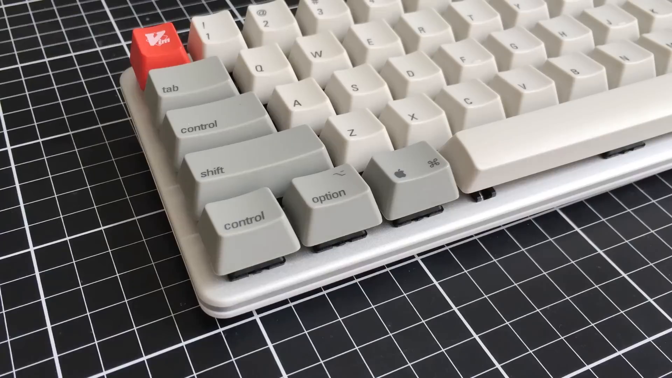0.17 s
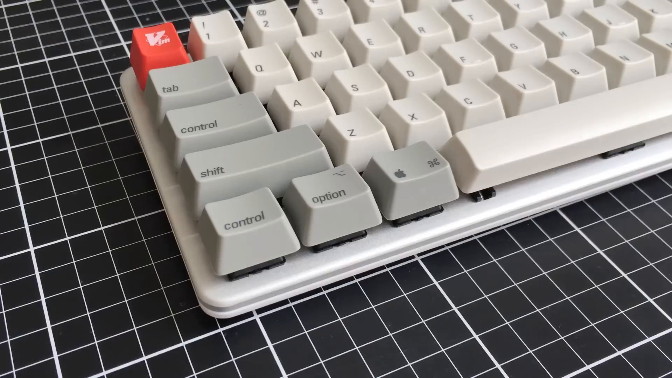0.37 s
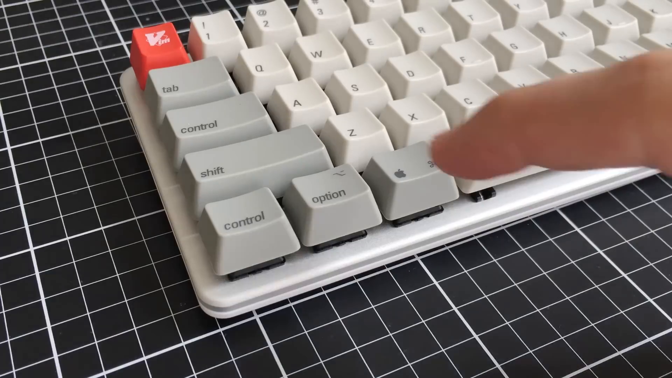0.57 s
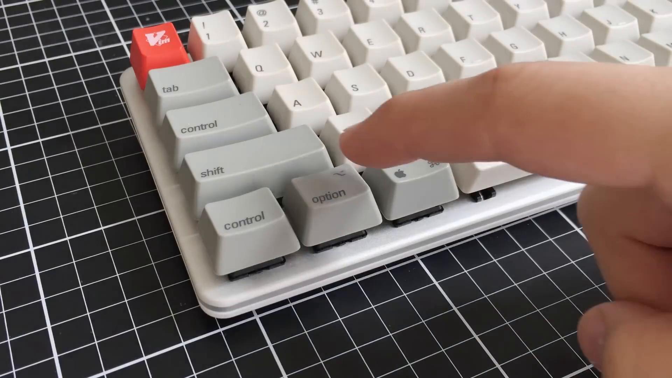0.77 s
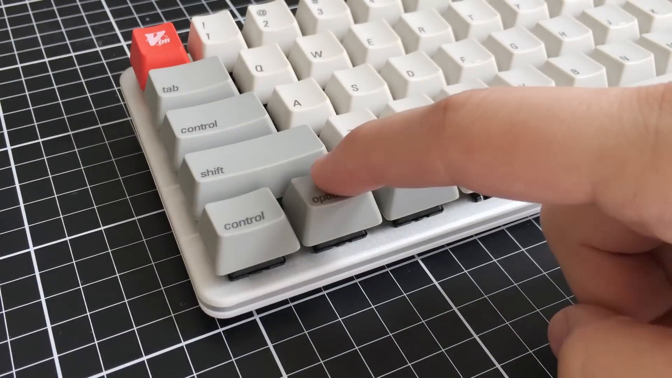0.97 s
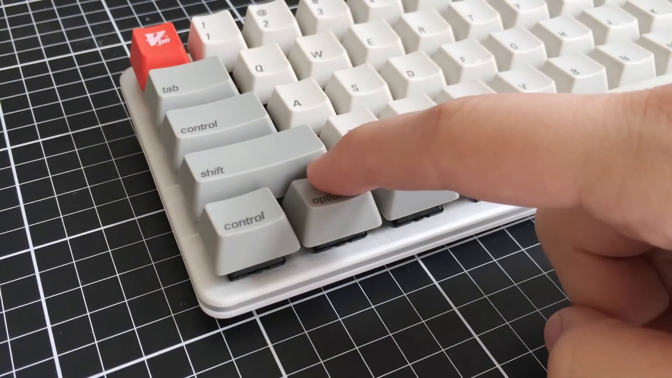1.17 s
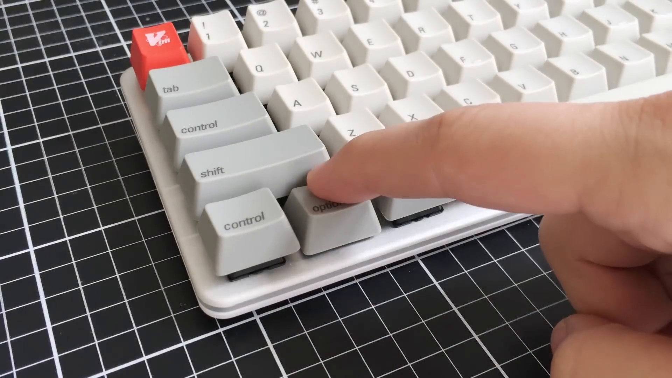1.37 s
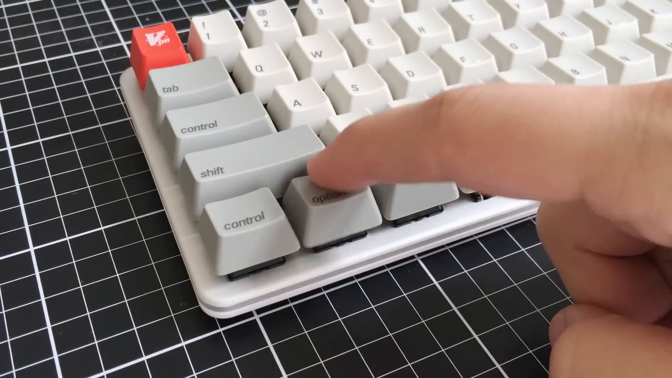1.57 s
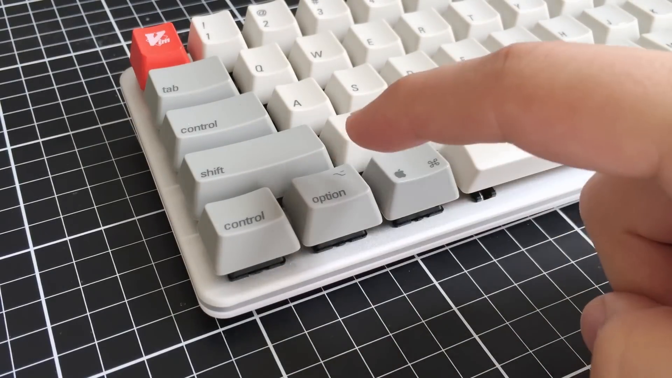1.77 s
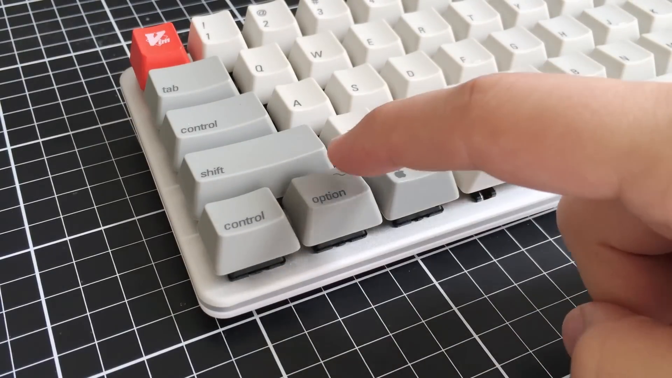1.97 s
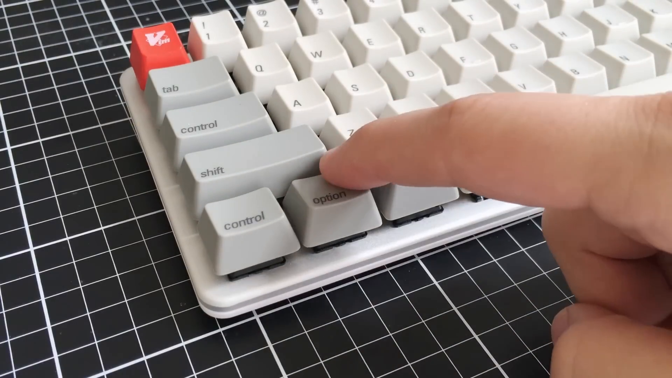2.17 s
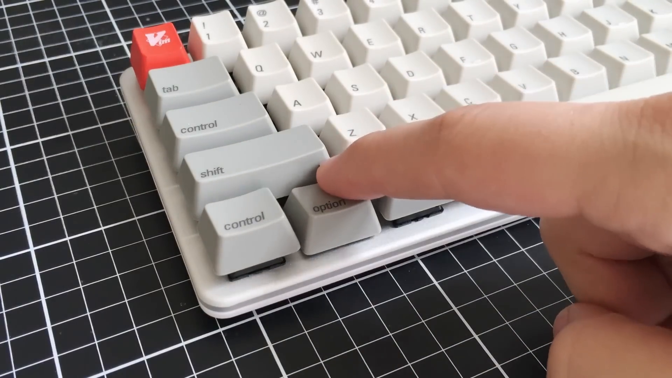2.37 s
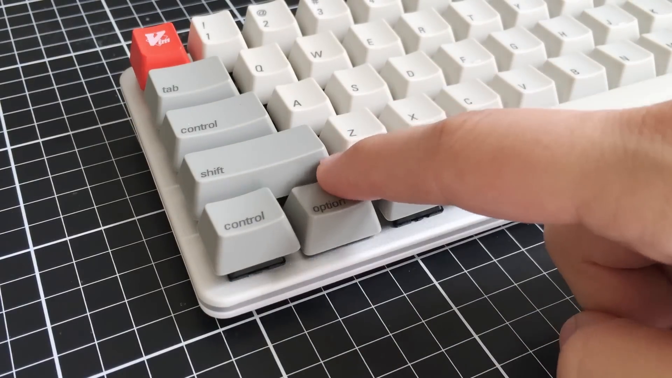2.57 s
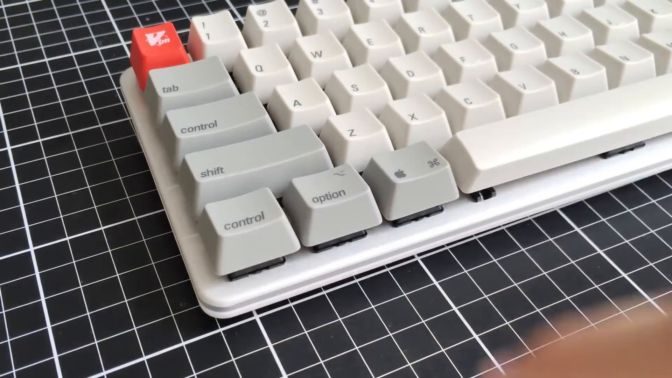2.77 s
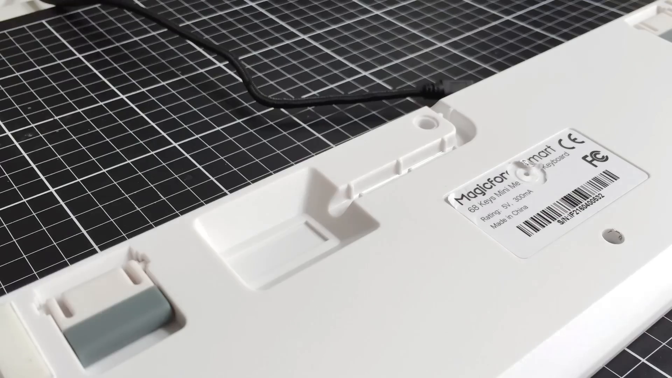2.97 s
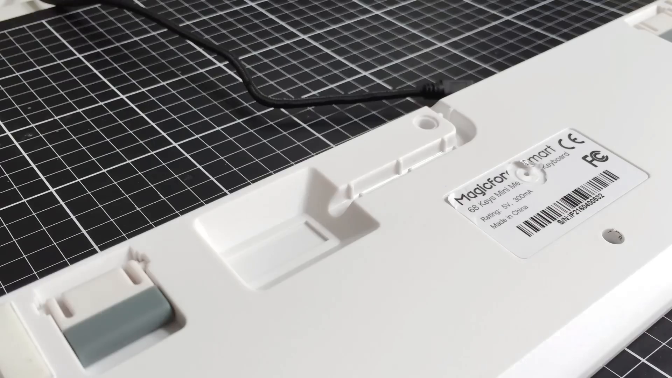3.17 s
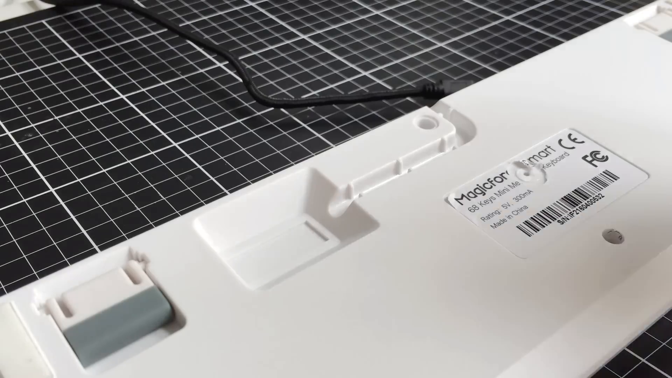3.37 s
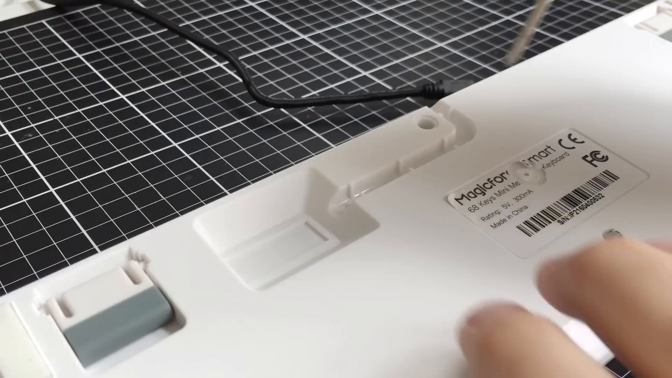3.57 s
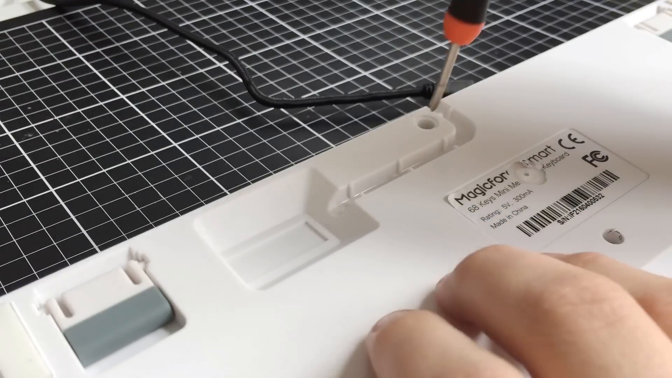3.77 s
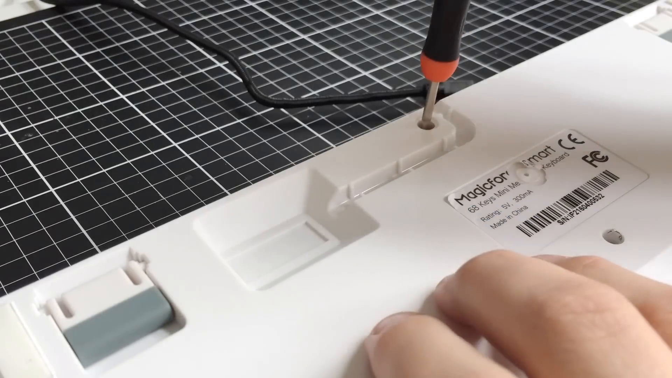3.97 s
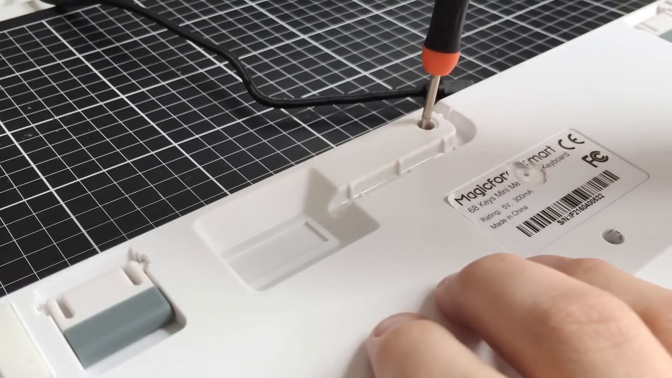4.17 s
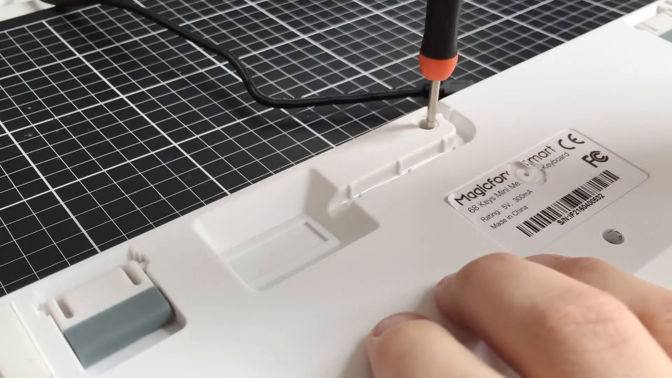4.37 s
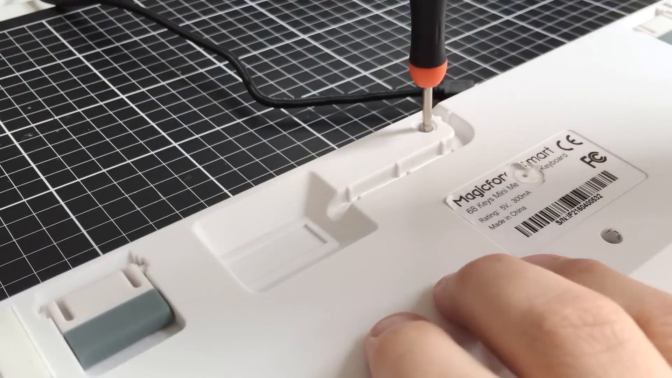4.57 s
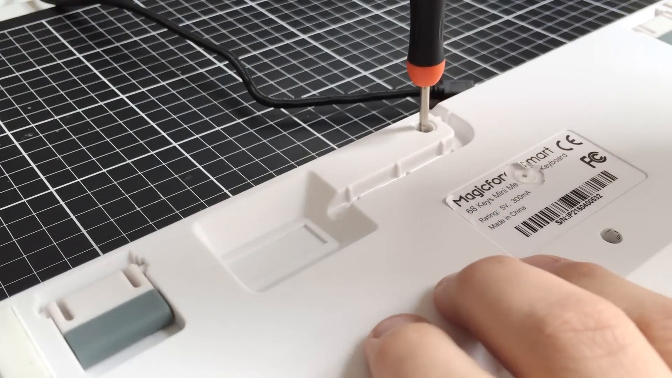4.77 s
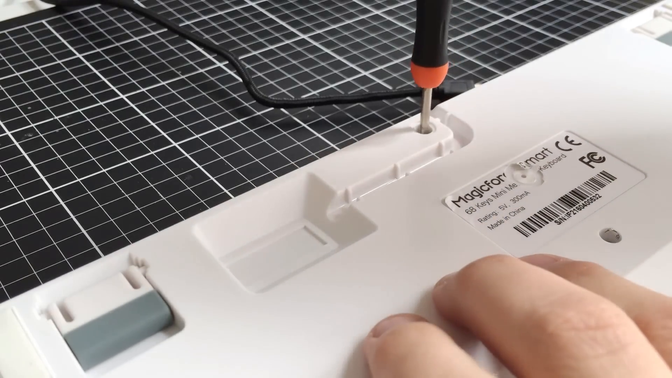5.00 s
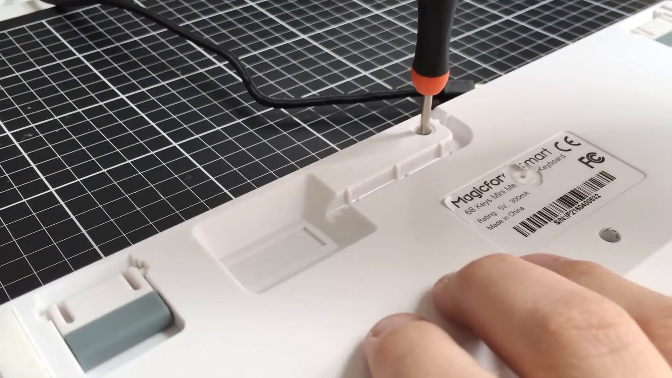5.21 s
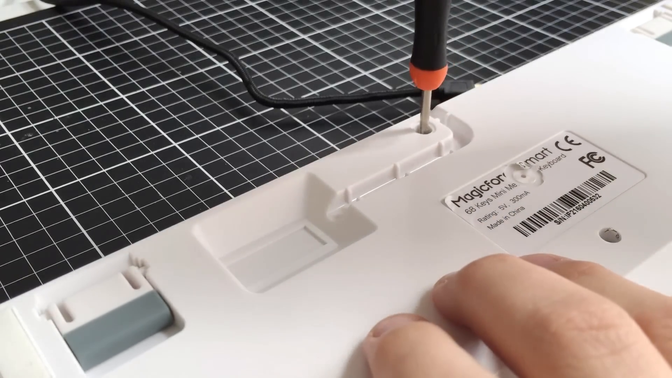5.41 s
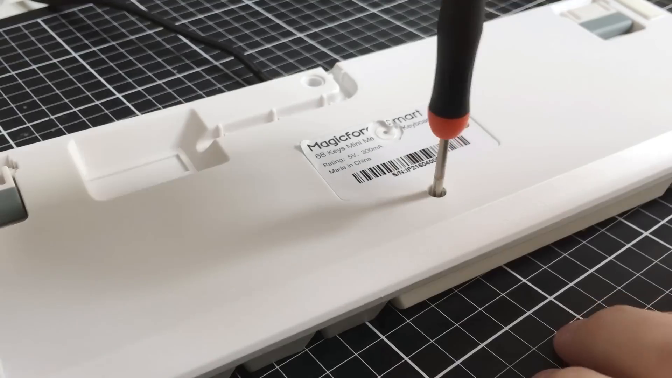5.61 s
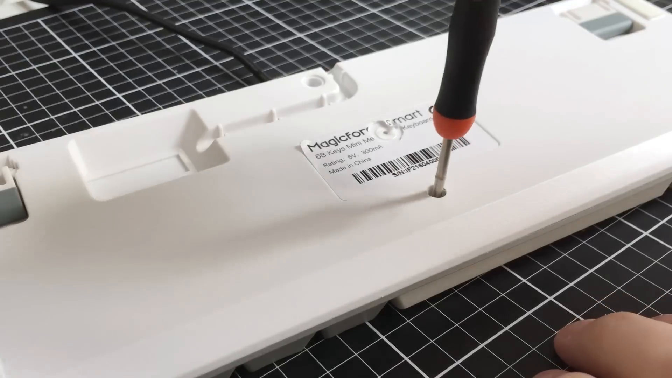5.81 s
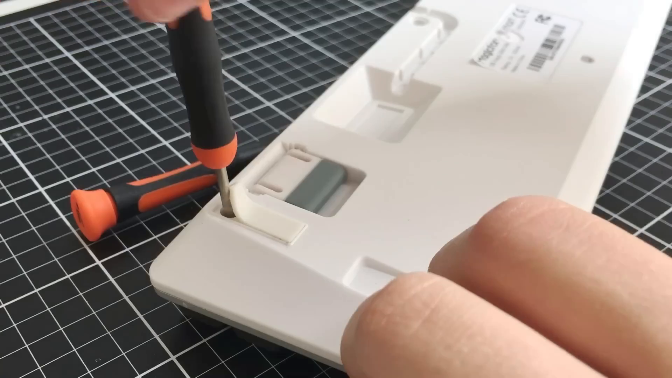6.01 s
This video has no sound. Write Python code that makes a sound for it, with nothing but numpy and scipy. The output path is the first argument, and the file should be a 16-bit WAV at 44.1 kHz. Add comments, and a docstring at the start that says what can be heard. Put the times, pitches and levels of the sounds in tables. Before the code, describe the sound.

The first 0.1 seconds are silent, then a quiet low room hum with slightly wavering tones begins. At 1.2 a fingertip faintly touches a plastic key; at 1.46 it bottoms out with a loud, crisp clack and a small desk thump, and at 1.7 snaps back up, softer and doubled. The pattern repeats: very light touch at 2.27, hard clack at 2.5, release at 2.73. At 2.95 sound drops out for an instant at a cut, and the hum returns. A barely audible touch comes at 3.23. From 4.03 a screwdriver knocks a hollow plastic case, with sharp clustered knocks around 4.47-4.5, 4.79, 4.86 and 4.98, over short gritty turns, low bumps and faint skin rustle. After 5 seconds the ticks are mostly faint, with a stronger one at 5.66 and tiny squeaks near 5.6, 5.7 and 5.94. Close microphone, small room, soft short tail.

```python
"""A desk in a small humming room: a finger touches, presses and releases a plastic key twice by a phone.
After a splice comes one more light touch, then a screwdriver knocks and turns in the upturned case.
Blows ring lists of dying tones and push the desk; turning is gritty clicks, hiss, rumble and squeaks.
Random taps make one early echo and a soft tail; shaped noise makes the hum."""
import sys
import numpy as np
from scipy import signal
from scipy.io import wavfile
from scipy.ndimage import uniform_filter1d

SR = 44100
rng = np.random.default_rng(int(sys.argv[2]) if len(sys.argv) > 2 else 0)


def undo_db(level):
    """Turn decibels back into plain size, where 20 dB means ten times bigger."""
    steps = np.asarray(level, float) / 20
    return 10 ** steps


def store_wav(level_fs):
    """Save 16-bit WAV to argv[1]."""
    pcm = np.round(np.clip(np.atleast_2d(level_fs), -1, 1) * 32767)
    wavfile.write(sys.argv[1], SR, pcm.T.astype(np.int16))


N = 266716  # length in samples


# light taps on plastic: (start_s, peak_db, chatter_ms)
TOUCHES = [(1.1987, -33, 6.1), (2.268, -41, 10), (3.2287, -44.5, 1.4)]
# the key bottoms out: (start_s, peak_db, slide_db from that peak)
PRESSES = [(1.4592, -7, -26), (2.5034, -6, -17.5)]
# slide, clack and bounce: (low_tilt_db_per_octave, high_tilt_db_per_octave, chatter_ms)
PRESS_STEPS = [(-5, -5, 9), (-10, -1.66, 2.6), (4, -11.5, 6.3)]
# the key snaps back up: (start_s, peak_db, rebound_after_ms, rebound_db from that peak)
RELEASES = [(1.7032, -19, 8.8, -1.5), (2.7311, -16.5, 5.7, -14.5)]
# slide, snap, rebound and settling: (low_tilt_db_per_octave, high_tilt_db_per_octave, chatter_ms)
RELEASE_STEPS = [(-12, -3.5, 9), (-10.5, -2, 3.3), (3, -3, 2.1), (-1, -11, 7.4)]


def key_contacts():
    """Spells touches, presses and releases out as single blows, since one key stroke hits several times."""
    low_db, high_db, touch_push_db = -3, -4, -58.5
    rows = [(s, db, low_db, high_db, ms, touch_push_db) for s, db, ms in TOUCHES]
    press_push_db, release_push_db = -23.5, -32.5  # push into the desk, from the peak of each contact
    for s, db, slide_db in PRESSES:
        # (ms from the clack, dB from its peak): the stem slides, bottoms out and bounces
        steps = [(-7.5, slide_db), (0, 0), (4.5, -12)]
        for (later_ms, step_db), colour in zip(steps, PRESS_STEPS):
            peak_db = db + step_db
            rows.append((s + later_ms / 1000, peak_db, *colour, peak_db + press_push_db))
    for s, db, rebound_ms, rebound_db in RELEASES:
        # (ms from the snap, dB from its peak): the stem slides, snaps up, rebounds and settles
        steps = [(-7.7, -20), (0, 0), (rebound_ms, rebound_db), (rebound_ms + 5.5, -12.5)]
        for (later_ms, step_db), colour in zip(steps, RELEASE_STEPS):
            peak_db = db + step_db
            rows.append((s + later_ms / 1000, peak_db, *colour, peak_db + release_push_db))
    return rows


# keycap, stem and plate; the faint short 9.9 kHz ring is the spring: (pitch_hz, level_db, t60_s)
KEY = [(260, -2.5, 0.016), (420, -21.5, 0.021), (918, -10.5, 0.029), (1320, -8.5, 0.021),
       (1990, -1, 0.0065), (2270, 4.5, 0.0051), (3267, -6, 0.013), (3567, 5, 0.0049), (4050, -1, 0.0019),
       (5520, -4, 0.01), (6660, -8.5, 0.0045), (9940, -29, 0.018), (12200, -24, 0.0024)]
# smooth colour of the key's many small tones that die at once: (pitch_hz, level_db)
KEY_SNAP = [(200, -18), (600, -12), (1300, -4), (2400, 0), (4000, -4), (5000, -10), (5650, -5), (6300, -11),
            (9200, -16), (9750, -4), (10300, -17), (16000, -17)]


def key_strokes():
    """The key's contacts ring its cap, stem, plate and spring."""
    rows = key_contacts()
    contacts_ms = [0.024] * len(rows)
    return knocks(rows, contacts_ms, KEY, KEY_SNAP, chatter_share=0.086, crack_db=27, ringing_db=-33.0)


# screwdriver knocks: (start_s, peak_db, low_tilt_db_per_octave, high_tilt_db_per_octave,
# contact_ms, played as 0.015 where shorter)
CASE_KNOCKS = [(4.0266, -7, -13, -9, 0.015), (4.2, -44.5, -21, -9, 0.21), (4.224, -37.5, -15, -16, 0.32),
               (4.4665, -10, 0, -1, 0.018), (4.4957, -8, -14.5, 4, 0.017), (4.4981, -3.5, -12, 7.5, 0.021),
               (4.633, -38, 0, -11, 0.31), (4.785, -9.5, -9.5, -8.5, 0.017), (4.859, -16.5, -7, -2, 0.015),
               (4.8613, -6.5, 14.5, 5, .016), (4.8635, -4, -11.5, -19.5, 0.026),
               (4.9755, -4.5, -8.5, -8.5, 0.011), (5.008, -33, 42, -8.5, 0.2), (5.2, -40, 3.7, -12, 0.3),
               (5.22, -36, -6, -9, 0.08), (5.374, -44.5, 8, -7, 0.23), (5.478, -41, -7.5, -17, 0.33),
               (5.4855, -35, -10, -3, 0.43), (5.572, -40.5, -4, -6, 0.28), (5.581, -34.5, -12, 9, 0.21),
               (5.6555, -22, 10, 0, 0.12), (5.714, -33, -4, -2, 0.076), (5.913, -48, 2, -8, 0.31)]
# hollow plastic case: (pitch_hz, level_db, t60_s)
CASE = [(446, -13, 0.008), (743, -2, 0.033), (1007, 1.5, 0.027), (1343, 3, 0.0085), (2054, -5.5, 0.015),
        (2324, -3, 0.0038), (3535, -10.5, 0.012), (5000, -10, 0.0077), (6740, -22.5, 0.015),
        (7900, -25, .004), (9040, -8, 0.0026), (719, -27.5, 0.059)]
# smooth colour of the case's many small tones that die at once: (pitch_hz, level_db)
CASE_SNAP = [(200, -28.5), (500, -14.5), (730, 4.5), (880, -3.5), (1330, 2), (1900, -9), (2500, 0.5),
             (3000, -9), (3600, -1.5), (4400, -5.5), (5300, -7), (7000, -7), (10000, -13.5), (16000, -19.5)]


def case_knocks():
    """The screwdriver knocks the hollow case; longer contacts sound duller."""
    chatter_ms, push_db = 2.53, -61.5
    rows = [(*row[:4], chatter_ms, push_db) for row in CASE_KNOCKS]
    contacts_ms = [row[4] for row in CASE_KNOCKS]
    return knocks(rows, contacts_ms, CASE, CASE_SNAP, chatter_share=0.23, crack_db=29.5, ringing_db=-27.5)


# the ringing desk: (pitch_hz, level_db, t60_s)
DESK = [(80, 1, 0.091), (101.4, 0, 0.25), (175, -11, 0.13), (226, -6, 0.11)]


def knocks(rows, contacts_ms, modes, colour, chatter_share, crack_db, ringing_db):
    """Each blow is a sharp contact and a dying chatter that ring the object and slowly push the desk.
    Returns the sound at the microphone and the smoother sound sent all around the room."""
    near, around, t = np.zeros(N), np.zeros(N), np.arange(1500) / SR
    jitter = rng.standard_normal((len(rows), len(t)))
    push = signal.fftconvolve(signal.windows.hann(round(.007 * SR)), ring(DESK))
    push = push / abs(push).max()
    desk_lag_s = 0.0091
    for (s, db, low_db, high_db, ms, push_db), contact_ms, noise in zip(rows, contacts_ms, jitter):
        blow = chatter_share * noise * abs(noise) * np.exp(-t * 1000 / max(ms, .2))
        blow[0] = 1
        body, click = ring(modes, low_db, high_db), snap(colour, low_db, high_db)
        wide = undo_db(ringing_db) * body  # summed over all directions the modes blur
        add(wide, 0, click)
        # a longer contact dulls the blow
        pad = np.exp(-4 * (t[:100] * 1000 / max(contact_ms, .015) - 3 / 2) ** 2)
        blow, wide = np.convolve(blow, pad), np.convolve(wide, pad)
        add(body, 0, undo_db(crack_db + 0.19 * db) * click)  # soft blows crack less
        sound = signal.fftconvolve(blow, body)
        sound *= undo_db(db) / abs(sound).max()
        add(near, s, sound)
        add(near, s + desk_lag_s, undo_db(push_db) * push)
        add(around, s, wide * np.linalg.norm(sound) / np.linalg.norm(wide))
    return near, around


def ring(modes, low_db=0, high_db=0, sustain=1):
    """A struck object sounds as a sum of dying tones."""
    hz, db, t60 = np.transpose(modes)[:, :, None]
    t = np.arange(SR // 4) / SR
    sign = (-1) ** np.arange(len(modes))[:, None]  # neighbouring modes move in opposition
    fade_db = 60 * t / np.maximum(sustain * t60, .0005)
    tones = sign * undo_db(db + tilt(hz, low_db, high_db) - fade_db) * np.sin(2 * np.pi * hz * t)
    return tones.sum(0)


def snap(colour, low_db, high_db):
    """A click of a given colour that starts at once (minimum phase)."""
    hz = abs(np.fft.fftfreq(2048, 1 / SR))
    log_gain = np.log(undo_db(read(colour, hz) + tilt(hz, low_db, high_db)))
    return np.fft.ifft(np.exp(np.conj(signal.hilbert(log_gain)))).real[:1024]


def tilt(hz, low_db, high_db):
    """Where and how hard a blow lands tilts the lows and the highs, in dB per octave."""
    low_octaves = np.clip(np.log2(1300 / (hz + 1)), 0, 1)
    high_octaves = np.clip(np.log2((hz + 1) / 3400), 0, 2)
    return low_db * low_octaves + high_db * high_octaves


# turns of the bit in the screw: (start_s, length_s, grinding_db, hand_on_desk_db)
TURNS = [(4.044, 0.2, -57, -56), (4.27, 0.067, -70, -62), (4.513, .13, -54, -56), (4.867, 0.11, -58, -54.5),
         (4.974, 0.074, -65, -43), (5.113, 0.13, -52, -53.5), (5.353, 0.069, -59.5, -47),
         (5.479, 0.016, -71, -51.5), (5.555, 0.023, -56, -47), (5.63, 0.061, -52, -46.5),
         (5.697, 0.016, -42.5, -41), (5.736, 0.115, -74, -52), (5.904, 0.099, -61.5, -56),
         (6.025, .03, -65, -54.5)]


def turn_levels():
    """Loudness curves of grinding and hand: each turn grips quickly and lets go in a steep fade."""
    power, t = np.zeros((N, 2)), np.arange(SR // 2) / SR
    grip_s, let_go_db_per_s = 0.0079, 493
    for s, length, *db in TURNS:
        turn = np.minimum(t / grip_s, 1) * undo_db(-let_go_db_per_s * np.maximum(t - length, 0))
        add(power, s, (turn[:, None] * undo_db(db)) ** 2)
    return np.sqrt(power.T)


def grinding(level):
    """Random gritty slips of the bit ring the case, more briefly than knocks do."""
    slips_per_s, spread_db = 1800, 3.5
    size = undo_db(spread_db * np.minimum(rng.exponential(size=N), 4))
    grit = size * rng.choice([-1, 1], N) * (rng.random(N) < slips_per_s / SR)
    body = ring(CASE, low_db=-13, high_db=-4, sustain=0.6)
    return level * evened(signal.oaconvolve(grit, body)[:N])


# the screw squeaks: (start_s, length_ms, pitch_hz it sags down to, apart from wobble, level_db)
SQUEAKS = [(5.612, 35, 2340, -58), (5.688, 11, 2240, -44.5), (5.935, 20, 2155, -50)]


def squeaks():
    """Short wobbling tones that sag in pitch as the screw slips."""
    out = np.zeros(N)
    wobble, sag = .07, .08  # shares of the pitch
    for (s, ms, hz, db), noise in zip(SQUEAKS, rng.standard_normal((len(SQUEAKS), SR // 10))):
        u = np.linspace(0, 1, round(ms * SR / 1000))
        drift = evened(uniform_filter1d(noise, size=60))[:len(u)]
        pitch = hz * (1 + sag * (1 - u) ** 2 + wobble * drift)
        swell = np.sin(np.pi * np.sqrt(u))
        add(out, s, undo_db(db) * swell * np.sin(2 * np.pi * np.cumsum(pitch) / SR))
    return out


# skin brushes the handle: (middle_s, length_ms, level_db)
BRUSHES = [(4.92, 140, -54.5), (5.06, 160, -68), (5.15, 57, -67), (5.236, 78, -65.5), (4.62, 20, -74),
           (5.4, 98, -77.5), (5.545, 44, -66.5), (5.582, 35, -72), (5.72, 32, -65), (5.77, 80, -78.5),
           (5.86, 32, -68.5), (5.989, 42, -69)]
# colour of the skin's hiss: (pitch_hz, level_db)
SKIN = [(2000, -30.5), (5000, -7), (8000, 2), (11000, -8), (14000, 3), (15800, -6), (16200, -23)]


def skin_rustle():
    """Skin rubbing the handle makes a patchy hiss that swells and fades with each brush."""
    level = np.zeros(N)
    for s, ms, db in BRUSHES:
        add(level, s - ms / 2000, undo_db(db) * signal.windows.hann(round(ms * SR / 1000)))
    return level * hiss(SKIN, patchy_db=3.5)


# colour of the hand's rumble: (pitch_hz, level_db)
HAND = [(40, -14), (70, -8), (110, -1.5), (165, 4), (240, -1.5), (400, -9.5), (800, -44.5)]


def hand_rumble(level):
    """The hand weighing on the desk makes low patchy noise during the turns."""
    return level * hiss(HAND, patchy_db=4.5)


# low thuds as the case rocks on the desk: (start_s, pitch_hz, level_db before rise and fade)
THUDS = [(4.034, 160, -42), (4.5, 169, -43.5), (4.99, 164.6, -35.5), (5.551, 115, -39), (5.715, 203, -43.5),
         (5.735, 89.5, -42)]


def thuds():
    """Round low bumps that swell briefly and die."""
    out, t = np.zeros(N), np.arange(SR // 3) / SR
    rise_s, t60_s = .012, .25
    for s, hz, db in THUDS:
        level = np.minimum(t / rise_s, 1) * undo_db(db - 60 * t / t60_s)
        add(out, s, level * np.sin(2 * np.pi * hz * t))
    return out


# how long the room rings: (pitch_hz, t60_s)
ROOM = [(60, 0.44), (400, 0.17), (1100, 0.47), (3000, .65), (8000, 0.61), (16000, 0.1)]
# colour of the room's tail: (pitch_hz, level_db)
ROOM_COLOUR = [(100, 16.5), (500, -1), (2000, -4), (6000, -9), (16000, -8.5)]


def room(x):
    """One smeared early echo, then dense random taps whose bands die at their own speeds."""
    tail_db, echo_db, echo_ms, echo_spread_ms = -16.5, -20, 14.0, 2.0
    hz, t, z = signal.stft(rng.standard_normal(SR), SR, nperseg=256)
    z = z * undo_db(read(ROOM_COLOUR, hz)[:, None] - 60 * t / read(ROOM, hz)[:, None])
    tail = signal.istft(z, SR, nperseg=256)[1]
    tail = tail * np.clip(np.arange(len(tail)) / SR / 0.027, 0, 1)  # reflections build up
    tail = undo_db(tail_db) * tail / np.linalg.norm(tail)
    echo = rng.standard_normal(400) * np.exp(-np.arange(400) / SR * 1000 / echo_spread_ms)
    add(tail, echo_ms / 1000, undo_db(echo_db) * echo / np.linalg.norm(echo))
    return signal.fftconvolve(x, tail)[:N]


# colour of the broad room noise: (pitch_hz, level_db per Hz, relative)
HUM = [(25, -29.5), (40, -9.5), (60, -9), (130, -8.5), (250, -9), (330, -19.5), (540, -21.5), (1000, -20),
       (1510, -25), (2000, -29.5), (4000, -36.5), (8000, -41.5), (13300, -45.5), (16500, -62)]
# room resonances stirred by the hum: (pitch_hz, width_hz, level_db)
HUM_TONES = [(56, 5, -61.5), (84, 11, -86.5), (123.3, 14, -65.5), (157.8, 8.4, -70), (203.8, 12, -72),
             (212.8, 12, -63.5), (239, 11, -76.5), (252.5, 7.5, -68.5)]


def hum():
    """Broad room noise with wavering low tones, each a slow random sway carried up to its pitch."""
    t, out = np.arange(N) / SR, undo_db(-60) * hiss(HUM, patchy_db=2.0)
    for hz, width, db in HUM_TONES:
        r = np.exp(-np.pi * width / SR)
        sway = signal.lfilter([1], [1, -r], rng.standard_normal((N, 2)) @ [1, 1j])
        out += undo_db(db) * evened((sway * np.exp(2j * np.pi * hz * t)).real)
    return out


def hiss(spectrum, patchy_db):
    """Noise of a given colour with drifting louder and softer patches."""
    frames, hz = N // 256 + 5, np.fft.rfftfreq(1024, 1 / SR)
    a, b, patches = rng.standard_normal((frames, 513, 3)).T
    patches = uniform_filter1d(patches, size=6, axis=0)  # smooth over pitch, then time
    patches = evened(uniform_filter1d(patches, size=12, axis=1))
    z = (a + 1j * b) * undo_db(read(spectrum, hz)[:, None] + patchy_db * patches)
    return evened(signal.istft(z, nperseg=1024, noverlap=768)[1][:N])


def evened(x):
    """Scales to rms 1."""
    return x / np.sqrt(np.mean(x ** 2) + 1e-20)


def read(points, hz):
    """Reads a table between its points on a log-frequency axis."""
    f, value = np.transpose(points)
    return np.interp(np.log(hz + 1), np.log(f + 1), value)


def add(mix, s, sound):
    """Mixes a sound in at time s."""
    part = mix[round(s * SR):][:len(sound)]
    part += sound[:len(part)]


def scene():
    """Key before the splice, a touch and the screwdriver after it, in one room."""
    key, key_around = key_strokes()
    case, case_around = case_knocks()
    grind_level, hand_level = turn_levels()
    rubs = grinding(grind_level) + skin_rustle() + hand_rumble(hand_level) + squeaks()
    before = np.arange(N) < SILENCES[1][1] * SR
    # the splice cuts off the room tail of what came before
    tails = before * room(key_around * before)
    tails += room(key_around * ~before + case_around + rubs)
    return (key + case + rubs + tails + thuds() + hum())[None]


def top_cut(x):
    """Nothing passes above the cut-off."""
    return signal.sosfilt(signal.butter(12, 17010, fs=SR, output="sos"), x)


# silence at the start and at the splice: (start_s, end_s)
SILENCES = [(0, 0.11), (2.951, 2.9740)]


def record(dry):
    """The microphone passes a limited band; the start and the splice are silent."""
    low_hz, top_hz = 48, 16500
    band = signal.sosfilt(signal.butter(3, low_hz, "high", fs=SR, output="sos"), dry)
    band = signal.sosfilt(signal.cheby1(8, .5, top_hz, fs=SR, output="sos"), band)
    t, on = np.arange(N) / SR, np.ones(N)
    for t0, t1 in SILENCES:
        on[(t >= t0) & (t < t1)] = 0
    return top_cut(band * on)


dry = scene()
out = record(dry)
store_wav(out)
```